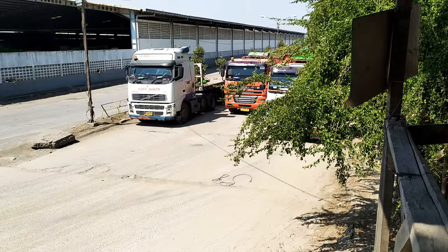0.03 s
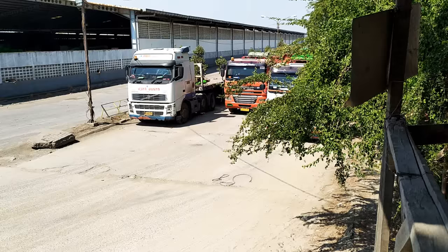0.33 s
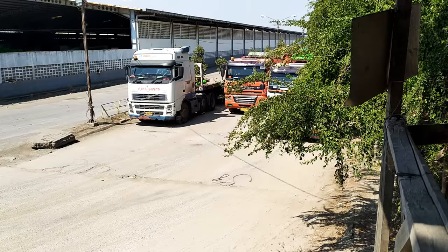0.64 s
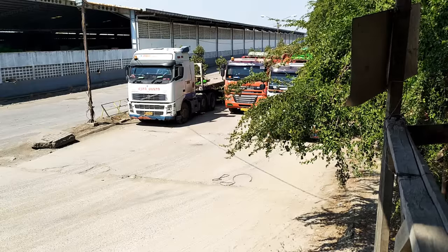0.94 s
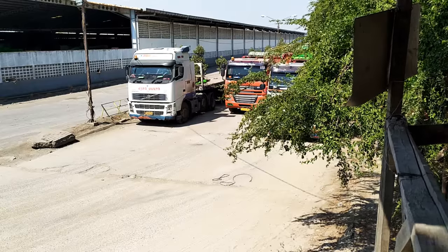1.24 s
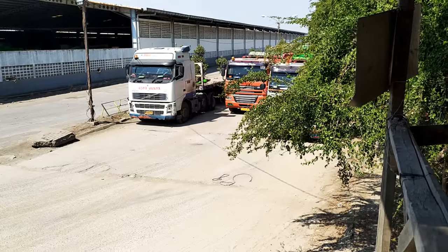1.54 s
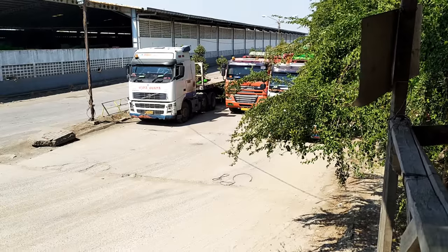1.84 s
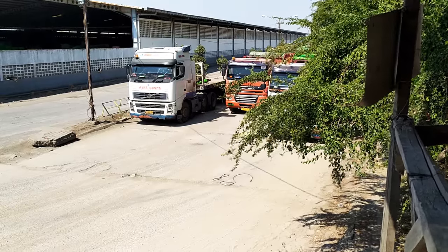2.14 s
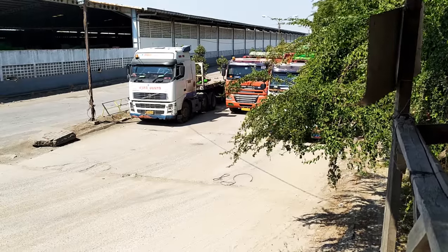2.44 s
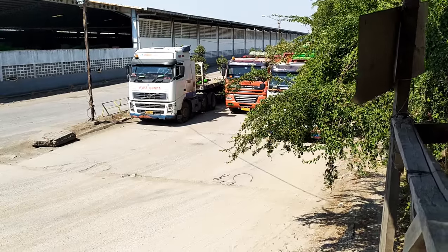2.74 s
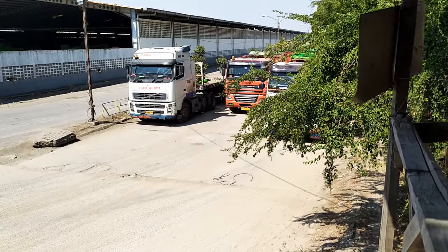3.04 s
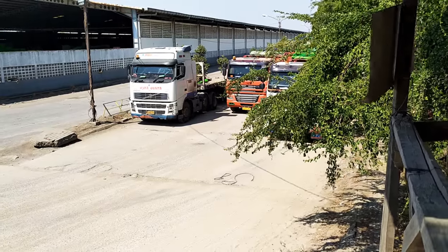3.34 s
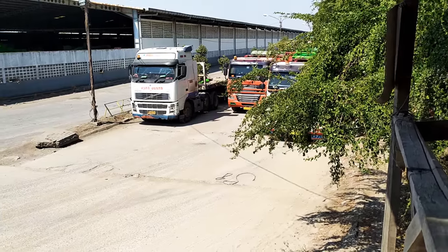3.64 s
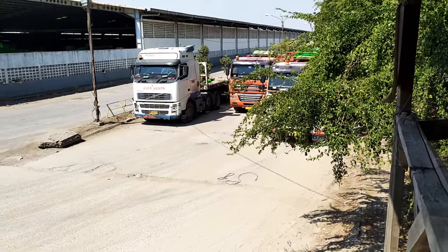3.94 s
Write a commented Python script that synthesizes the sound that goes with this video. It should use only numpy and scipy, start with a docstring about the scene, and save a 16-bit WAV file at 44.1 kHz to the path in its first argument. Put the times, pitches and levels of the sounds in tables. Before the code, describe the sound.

A truck's air brakes blast and hiss away over the low rumble of idling diesel engines.

```python
"""Diesel trucks rumble and clatter at idle, some way off in a concrete yard. One sets its air brakes:
a valve opens with a sharp, hollow blast, then a second, longer jet drains away, growing duller and
whistling as the pressure falls, while the brake groans faintly. Before and after it, loose metal
squeaks, clinks and rattles; a light wind nudges the microphone."""
import sys
import numpy as np
from scipy import signal
from scipy.fft import rfft, irfft
from scipy.io import wavfile
from scipy.ndimage import uniform_filter1d, map_coordinates

SR = 44100
rng = np.random.default_rng(int(sys.argv[2]) if len(sys.argv) > 2 else 0)


def put_to_file(sound):
    """Save the sound as 16-bit audio at rate SR, in the file named by the first command-line argument."""
    columns = np.atleast_2d(sound).T  # one column per channel
    safe = np.clip(columns, -1, 1)
    whole_steps = np.round(safe * 32767)
    wavfile.write(sys.argv[1], SR, whole_steps.astype(np.int16))


N = 176400
TIME = np.arange(N) / SR
FREQS = np.maximum(np.arange(N // 2 + 1) * SR / N, 1)

# stereo image of the yard: (frequency [Hz], left-right correlation)
STEREO_LIKENESS = [(60, 0.91), (120, 0.98), (240, 1), (480, 0.86), (950, 1), (1900, 0.12), (3800, 0.11),
                   (7500, 0.056)]
# its lean: (frequency [Hz], left minus right [dB])
STEREO_BALANCE = [(60, -3), (300, 0.6), (640, -0.3), (1400, 1.9), (3100, 3), (5500, 3.5), (7000, 6.5),
                  (9300, .5), (15000, 0)]

# tone colour of exhaust rumble and engine clatter: (frequency [Hz], relative level [dB])
RUMBLE_EQ = [(25, -17), (41, 17.5), (81, -6.5), (113, 0), (141, -4.5), (182, -5.5), (237, -5), (317, -4),
             (400, -13), (520, -52)]
CLATTER_EQ = [(240, -36), (400, -4.5), (630, -5), (964, -2.5), (1500, -10), (1660, -6.5), (2060, -9.5),
              (2510, -8), (4740, -17.5), (9370, -23), (15000, -39.5)]
# their fader moves: (time [s], level [dB])
RUMBLE_FADER = [(.1, -55.5), (.27, -50), (.39, -41.5), (.6, -44), (1.5, -43.5), (2.6, -42), (4, -41)]
CLATTER_FADER = [(.1, -52.5), (.33, -43.5), (.55, -44.5), (1.5, -45), (2.4, -40.5), (3, -42), (4, -40.5)]
# engine hum: (multiple of the firing rate, level at full rumble [dB])
FIRING_TONES = [(2, -53.5), (3, -49.5), (4, -52.5), (6, -52), (7, -56.5), (9, -52.5)]
# drone of a second engine: (time [s], pitch [Hz], level [dB])
DRONE_PATH = [(1.1, 104.7, -64), (1.7, 107, -46.5), (2.1, 113.3, -52), (2.45, 107.8, -45),
              (2.85, 116.9, -49), (3.3, 111.1, -44.5), (4, 111.4, -55)]

# wind buffets, squeals, chirps and rattles: (peak time [s], half length [s], level [dB])
WIND_SWELLS = [(0.896, 0.042, -39.5), (1.705, 0.03, -36), (2.092, 0.017, -37), (2.206, 0.019, -38),
               (2.475, 0.026, -38), (3.104, 0.035, -38)]
SQUEAL_SWELLS = [(0.155, 0.023, -51.5), (0.22, 0.017, -53)]
CHIRP_SWELLS = [(3.072, .013, -46.5), (3.167, .011, -52)]
RATTLE_SWELLS = [(0.32, 0.044, -48), (2.722, 0.037, -44), (3.385, .015, -47), (3.455, 0.029, -44.5),
                 (3.615, 0.03, -48)]
# metal's chirp partials, contact grit and ringing modes: (frequency [Hz], relative level [dB])
CHIRP_MODES = [(7480, 0), (11150, 0), (14750, -3)]
GRIT_EQ = [(2000, -3), (5000, 9), (8500, 5.5), (11000, 0.5), (15000, -12)]
METAL_MODES = [(5660, -3.5), (5770, -9.5), (8400, -11.5), (11100, -23.5)]
# single knocks of loose metal: (time [s], tick level [dB], ring gain [dB])
CLINK_HITS = [(.458, -45, -50), (2.703, -41, -56), (2.982, -40, -43), (3.143, -57.5, -44),
              (3.194, -55, -42), (3.235, -46, -41.5), (3.282, -37, -39), (3.367, -36.5, -50),
              (3.433, -36.5, -46), (3.732, -49, -42)]

# brake groan: (peak time [s], half length [s], pitch [Hz], level [dB])
GROAN_NOTES = [(1.68, .13, 836, -48.5), (1.53, .08, 613, -49.5)]
# air line whistles: (peak time [s], half length [s], pitch [Hz], glide [Hz/s], width [Hz], level [dB])
FAINT_WHISTLES = [(.9, 0.05, 1412, -100, 55, -41), (1.06, 0.23, 12750, -750, 380, -41.5),
                  (0.963, 0.11, 2780, -55.5, 240, -44)]
# the jet's main whistle: (time [s], pitch [Hz], level [dB])
WHISTLE_PATH = [(1.25, 5560, -51), (1.42, 5270, -47.5), (1.68, 5000, -45), (1.83, 4890, -37),
                (1.92, 4820, -46), (1.98, 4750, -53)]
# tone colour of the long jet and the first blast: (frequency [Hz], relative level [dB])
JET_EQ = [(300, -11.5), (900, -7.5), (1900, -9), (2850, -8), (3500, -7), (4900, -7), (5900, -3.5),
          (7100, -2), (8000, -1), (9600, -1), (11000, -8), (13500, -12), (15000, -23)]
BLAST_EQ = [(300, -8), (900, -7.5), (2200, -8), (3000, -2), (5000, -3), (7200, 1.5), (9000, 0), (11500, -4),
            (15000, -13)]
# air flow of the jet: (time [s], level [dB])
JET_FADER = [(.76, -64), (.83, -33.5), (.9, -28), (1.0, -28.5), (1.2, -31.5), (1.5, -34), (1.8, -37),
             (2.05, -41.5), (2.3, -49.5), (2.7, -52)]
# peaks and dips in the hiss: most give it its hollow colour, and a further narrow dip sits near 9.5 kHz:
# (frequency [Hz], width [Hz], gain [dB])
HOLLOW_BANDS = [(2890, 130, 12), (3314, 94, 12.5), (3600, 145, -27), (3734, 67, 18.5), (4080, 83, -11),
                (4140, 250, 10), (4870, 90, 5), (6100, 120, -10), (9470, 130, -11), (9740, 190, 10)]
# echoes off the chassis and the ground: (delay [s], gain)
CHASSIS_ECHOES = [(.0022, 0.38), (.0051, 0.73), (.0083, .2)]


def from_db(db):
    """Decibels to gain."""
    return 10 ** (np.asarray(db) / 20)


def unit_rms(x):
    """Scale to unit power."""
    return x / np.sqrt(np.mean(x ** 2) + 1e-20)


def automation(rows):
    """Columns of a time table at every sample."""
    times, *columns = np.transpose(rows)
    return [np.interp(TIME, times, column) for column in columns]


def colour(points):
    """A spectrum table at every frequency."""
    hz, value = np.transpose(points)
    return np.interp(np.log(FREQS), np.log(hz), value)


def resonance(hz, width_hz):
    """Gain of a resonance with steep skirts."""
    return 1 / (1 + ((FREQS ** 2 - hz ** 2) / (FREQS * width_hz)) ** 2 / 4) ** 2


def drift(rate_hz):
    """Smooth random wander with a spread of 1."""
    return unit_rms(irfft(rfft(rng.standard_normal(N)) / (1 + (FREQS / rate_hz) ** 2), N))


def swell(peak_s, half_s):
    """A bell-shaped rise and fall."""
    return np.exp(-((TIME - peak_s) / half_s) ** 2)


def swells(rows):
    """Envelope of a table of short swells."""
    return sum(from_db(db) * swell(peak_s, half_s) for peak_s, half_s, db in rows)


def flicker(x, depth_db=2.3, patch_hz=150, patches_per_s=5, size=512):
    """Neighbouring bands swell and fade on their own."""
    hz, times, spectrum = signal.stft(x, SR, nperseg=size)
    grid = np.meshgrid(hz / patch_hz, times * patches_per_s, indexing="ij")
    patches = map_coordinates(rng.standard_normal((size, size)), grid, mode="mirror")
    return unit_rms(signal.istft(spectrum * from_db(depth_db * patches), SR, nperseg=size)[1][:, :N])


def yard_noise(gain, left_lag_s=.00016):
    """Coloured stereo noise from across the yard: narrow in the bass, wide and leftish in the treble."""
    mid, side = rfft(rng.standard_normal((2, N)))
    alike = np.clip(colour(STEREO_LIKENESS), -.99, .99)
    sides = np.array([[1], [-1]])
    pair = np.sqrt(1 + alike) * mid + sides * np.sqrt(1 - alike) * side
    lag = np.exp(-1j * np.pi * sides * FREQS * left_lag_s)
    pan = from_db(sides * colour(STEREO_BALANCE) / 2)
    return unit_rms(irfft(pair * lag * gain * pan, N))


def engines(firing_hz=27.98, wander=.0071, throb_depth=.11):
    """Idling diesels: hum and drone under exhaust rumble and clatter that throb with the firings."""
    phase = 2 * np.pi * np.cumsum(firing_hz * (1 + wander * drift(4.6))) / SR
    throb = 1 + throb_depth * np.cos(phase) * (1 + drift(11) / 2)
    rumble_db, = automation(RUMBLE_FADER)
    clatter_db, = automation(CLATTER_FADER)
    hum = sum(from_db(db + 2 * drift(1.3)) * np.sin(round(k) * phase + rng.uniform(0, 2 * np.pi))
              for k, db in FIRING_TONES)
    hum *= np.sqrt(2) * from_db(rumble_db - rumble_db.max())
    rumble_band = 1 / np.sqrt((1 + (FREQS / 390) ** 10) * (1 + (72 / FREQS) ** 10))
    rumble = yard_noise(from_db(colour(RUMBLE_EQ)) * rumble_band)
    clatter = yard_noise(from_db(colour(CLATTER_EQ)) / np.sqrt(1 + (380 / FREQS) ** 10))
    bass = yard_noise(resonance(hz=56.7, width_hz=13)) * from_db(-52.5)
    bass *= np.clip((TIME - .38) / .034, 0, 1)
    drone_hz, drone_db = automation(DRONE_PATH)
    drone = np.sqrt(2) * np.sin(2 * np.pi * np.cumsum(drone_hz) / SR)
    drone *= from_db(drone_db + .5 * drift(4.4))
    noise = rumble * from_db(rumble_db) + clatter * from_db(clatter_db + .8 * drift(18))
    return throb * noise + hum + bass + drone


def wind(spread=.96):
    """Short, deep buffets on the microphone, partly different in each channel."""
    common, left, right = rng.standard_normal((3, N))
    gusts = irfft(rfft(common + spread * np.array([left, right])) * resonance(hz=58, width_hz=20), N)
    power = uniform_filter1d(np.mean(gusts ** 2, axis=0), size=4000)
    return gusts / np.sqrt(power + 1e-12) * swells(WIND_SWELLS)


def squeaks():
    """A thin, high squeal sounds twice; later, rubbing metal gives two brief chirps."""
    squeal = yard_noise(resonance(hz=7780, width_hz=36))
    chirp = yard_noise(sum(from_db(db) * resonance(hz, width_hz=480) for hz, db in CHIRP_MODES))
    return squeal * swells(SQUEAL_SWELLS) + chirp * swells(CHIRP_SWELLS)


def rattles(contacts_per_s=300, decay_s=.0017, rub=.77, ring_db=-6.5):
    """Loose metal chatters in short bursts: tiny contacts give bright grit, and a few notes ring."""
    grit = flicker(yard_noise(from_db(colour(GRIT_EQ))), depth_db=4, patch_hz=516, patches_per_s=25.18)
    touches = (rng.random(N) < contacts_per_s / SR) * rng.uniform(.41, 1, N)
    contacts = signal.lfilter([1], [1, -np.exp(-1 / (decay_s * SR))], touches)
    chatter = unit_rms(grit * (rub + contacts))
    ring = yard_noise(sum(from_db(db) * resonance(hz, width_hz=120) for hz, db in METAL_MODES))
    return (chatter + ring * from_db(ring_db)) * swells(RATTLE_SWELLS)


def clinks(attack_s=.0018, tick_decay_s=.0067, ring_decay_s=.0086, spread_db=1.5, size=4096):
    """Single knocks of the loose metal: a sharp tick, and its modes ring briefly."""
    out, age = np.zeros((2, N)), TIME[:size]
    grit = yard_noise(from_db(colour(GRIT_EQ)))
    attack = np.minimum(age / attack_s, 1)
    for start_s, tick_db, ring_db in CLINK_HITS:
        span = slice(int(start_s * SR), int(start_s * SR) + size)
        tick = from_db(tick_db) * grit[:, span] * np.exp(-age / tick_decay_s)
        ring = sum(from_db(ring_db + db + spread_db * rng.standard_normal((2, 1)))
                   * np.sin(2 * np.pi * (hz * age + rng.random())) for hz, db in METAL_MODES)
        out[:, span] += attack * (tick + np.sqrt(2) * ring * np.exp(-age / ring_decay_s))
    return out


def brake_groan(waver=.008, rough_db=2.5):
    """Two rough, wavering tones overlap as the brake takes hold."""
    out = 0
    for peak_s, half_s, hz, db in GROAN_NOTES:
        phase = 2 * np.pi * np.cumsum(hz * (1 + waver * drift(40))) / SR
        out += np.sqrt(2) * np.sin(phase) * from_db(db + rough_db * drift(25)) * swell(peak_s, half_s)
    return out


def line_whistles():
    """Faint, breathy edge tones of the air line come and go, sinking with the pressure."""
    out = 0
    for peak_s, half_s, hz, hz_per_s, width_hz, db in FAINT_WHISTLES:
        breath = signal.hilbert(yard_noise(resonance(hz, width_hz)))
        glide = np.exp(1j * np.pi * hz_per_s * (TIME - peak_s) ** 2)
        out += (breath * glide).real * from_db(db) * swell(peak_s, half_s)
    return out


def jet_whistle():
    """One breathy edge tone grows out of the jet and sinks with the pressure."""
    hz, db = automation(WHISTLE_PATH)
    breath = signal.hilbert(yard_noise(resonance(hz.mean(), width_hz=110)))
    glide = np.exp(2j * np.pi * np.cumsum(hz - hz.mean()) / SR)
    gate = (TIME > WHISTLE_PATH[0][0]) * (TIME < WHISTLE_PATH[-1][0])
    return (breath * glide).real * from_db(db) * gate


def hollow_db():
    """The peaks and dips of the hiss, its hollow colour plus a narrow dip near 9.5 kHz, at every frequency."""
    return sum(db / (1 + (2 * (FREQS - hz) / width_hz) ** 2) for hz, width_hz, db in HOLLOW_BANDS)


def chassis_comb():
    """Comb-filter gain of the direct sound plus its short echoes."""
    return np.abs(1 + sum(gain * np.exp(-2j * np.pi * FREQS * delay) for delay, gain in CHASSIS_ECHOES))


def draining_jet(hollowness=.2, dull_above_hz=7960, dull_db_per_s=3.5):
    """The air line drains; the top of the hiss dies first."""
    age = TIME - JET_FADER[0][0]
    hiss = flicker(yard_noise(from_db(colour(JET_EQ) + hollowness * hollow_db())))
    top = irfft(rfft(hiss) / (1 + (dull_above_hz / FREQS) ** 10), N)
    top_loss = 1 - from_db(-dull_db_per_s * np.maximum(age, 0))
    flow_db = automation(JET_FADER)[0] + .48 * drift(27)
    return (hiss - top * top_loss) * from_db(flow_db) * (age > 0)


def valve_blast(open_s=.5655, attack_s=.032, close_s=.8, hollow_build_s=.077):
    """The valve snaps open: a low chuff, and a hiss that turns hollow as it loses its first force."""
    age = np.maximum(TIME - open_s, 0)
    attack = np.minimum(age / attack_s, 1) ** 1.46
    since_peak = np.maximum(age - attack_s, 0)
    punch_db = 4.5 * np.exp(-since_peak / .16)
    fade_db = 21.5 * since_peak + 33 * np.maximum(TIME - close_s, 0)
    plain = yard_noise(from_db(colour(BLAST_EQ)) * chassis_comb())
    hollow = yard_noise(from_db(colour(BLAST_EQ) + hollow_db()))
    plain_share = np.exp(-(since_peak / hollow_build_s) ** 2)
    hiss = flicker(np.sqrt(plain_share) * plain + np.sqrt(1 - plain_share) * hollow)
    chuff = yard_noise(resonance(hz=1180, width_hz=700)) * np.exp(-since_peak / .025)
    return attack * (hiss * from_db(-29.5 + punch_db - fade_db) + chuff * from_db(-38.5))


def scene():
    """The engine bed, the air brake on top, then small metal and wind."""
    bed = engines()
    air_brake = valve_blast() + draining_jet() + jet_whistle() + line_whistles() + brake_groan()
    return bed + air_brake + rattles() + clinks() + squeaks() + wind()


def record(dry):
    """A quick fade-in after a moment of silence, and a steep high cut."""
    start_s, fade_s, cutoff_hz = .095, .014, 15400
    opened = dry * np.clip((TIME - start_s) / fade_s, 0, 1)
    return signal.sosfilt(signal.ellip(12, .2, 80, cutoff_hz, fs=SR, output="sos"), opened)


dry = scene()
out = record(dry)
put_to_file(out)
```